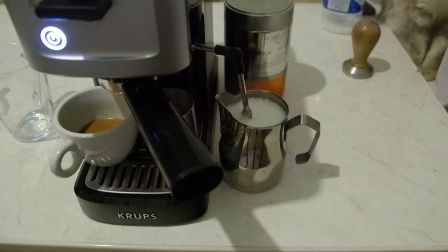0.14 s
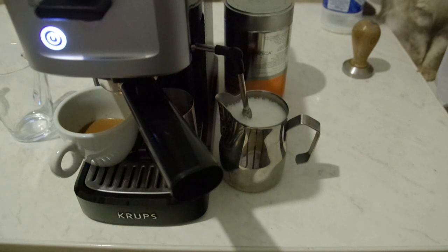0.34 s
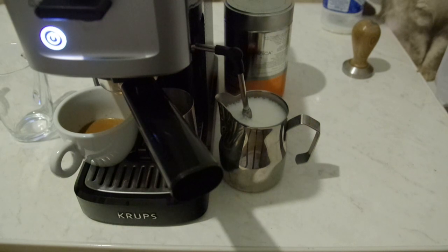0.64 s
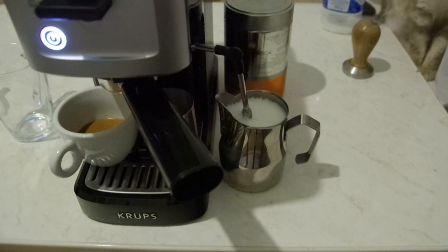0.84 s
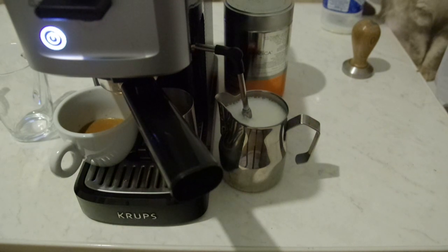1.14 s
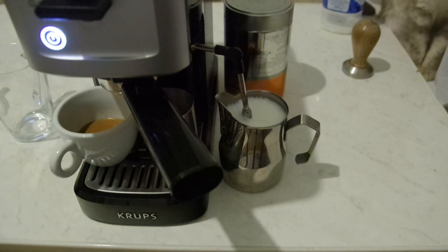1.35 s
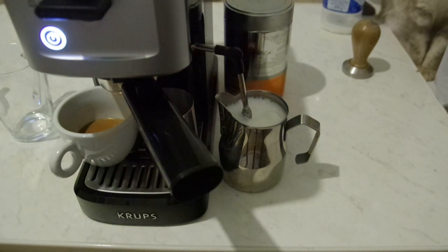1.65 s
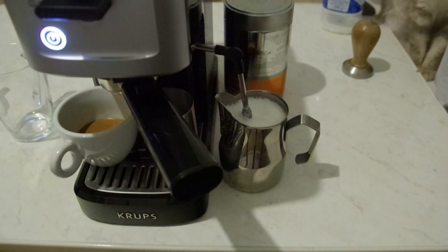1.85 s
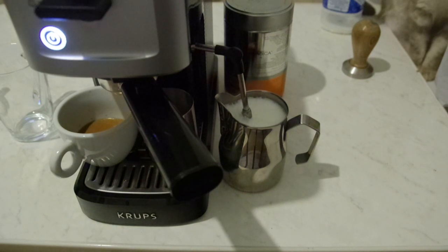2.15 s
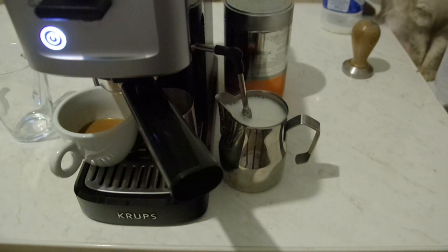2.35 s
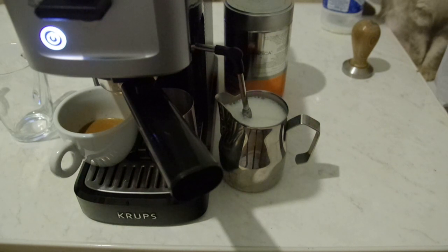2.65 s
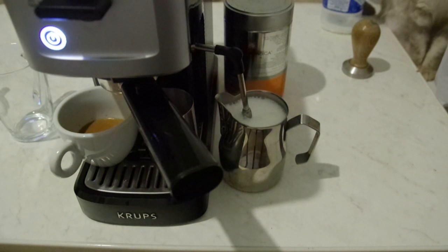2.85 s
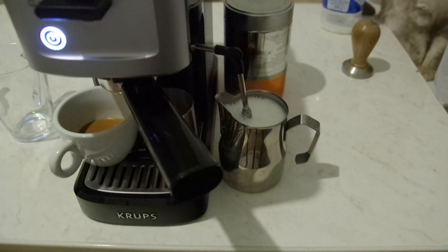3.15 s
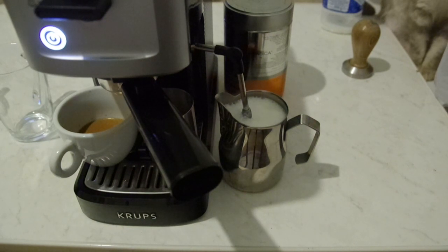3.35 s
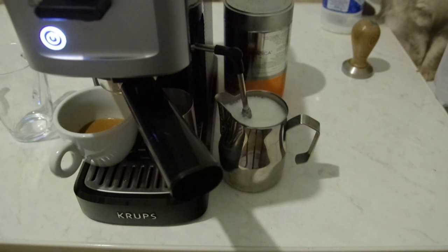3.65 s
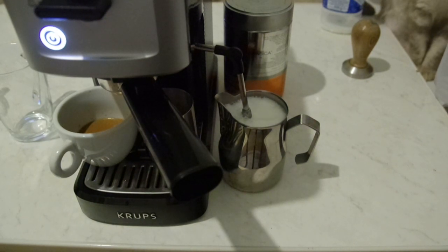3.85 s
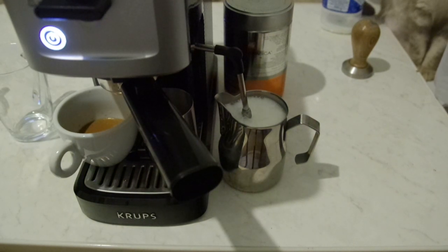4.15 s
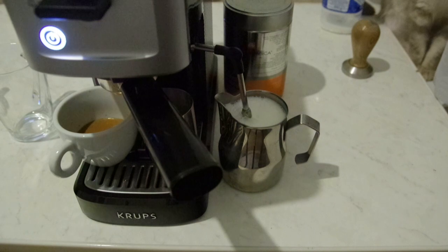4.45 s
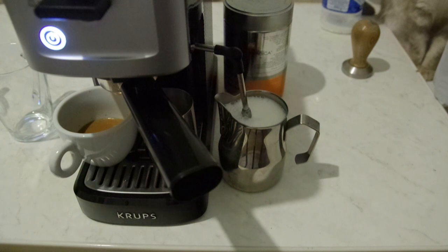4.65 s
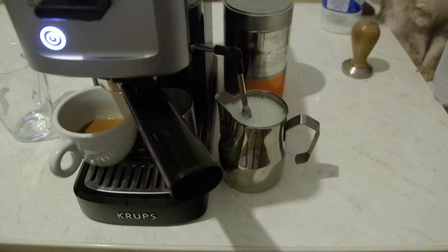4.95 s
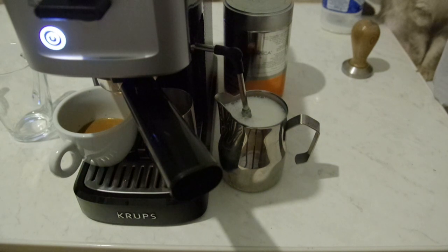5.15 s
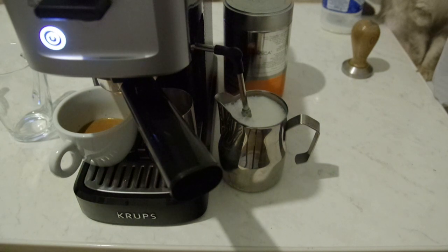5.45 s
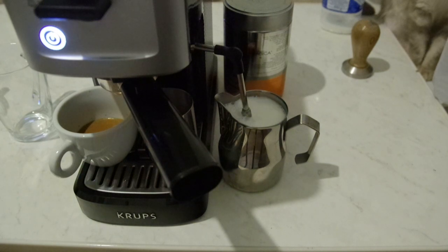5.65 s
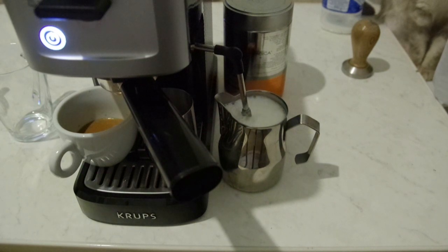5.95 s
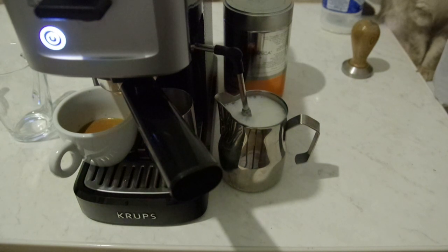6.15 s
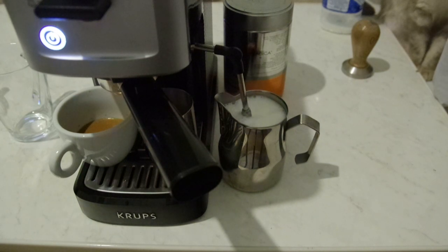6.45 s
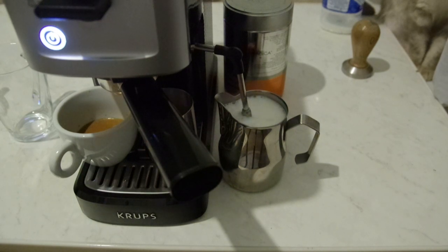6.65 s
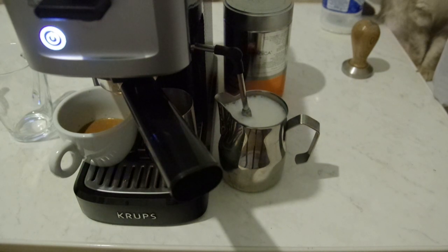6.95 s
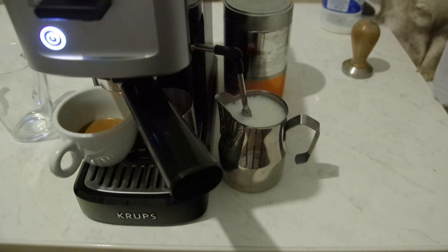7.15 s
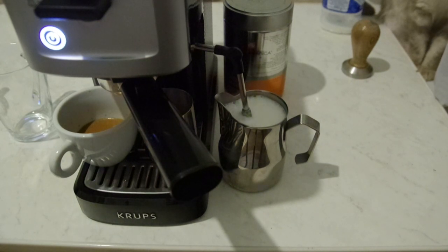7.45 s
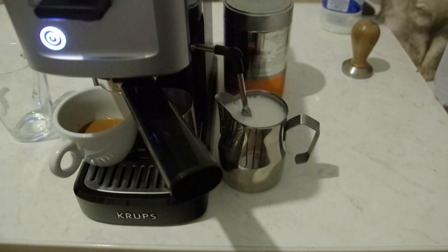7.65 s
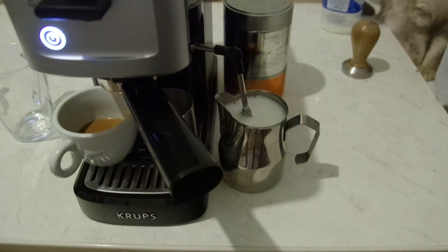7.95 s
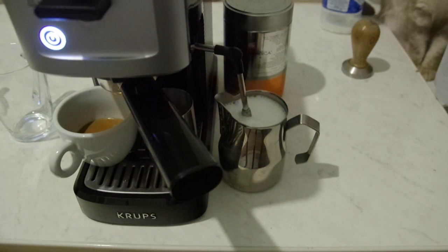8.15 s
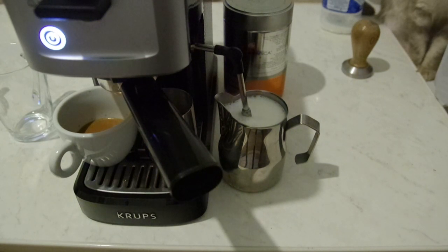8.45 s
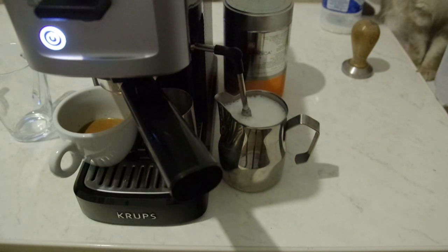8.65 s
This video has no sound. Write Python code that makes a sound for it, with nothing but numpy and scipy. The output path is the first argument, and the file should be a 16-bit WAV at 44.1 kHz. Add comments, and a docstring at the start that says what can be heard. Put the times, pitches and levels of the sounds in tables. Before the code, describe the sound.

A steam wand hisses and seethes in milk in a metal pitcher, slowly softening, while a pump thuds in fours with a short rest.

```python
"""The steam wand of a small espresso machine froths milk in a steel pitcher on a kitchen counter, heard close.
Collapsing steam is noise and clicks shaped by the milk and the ringing pitcher; the tip hisses and fizzes
as brighter noise, and bright spurts break out at the surface. The pump feeds the heater with single thuds,
four and a rest, that ring the housing and shake loose parts. Low room noise and a short kitchen echo remain."""
import sys
import numpy as np
from scipy import signal
from scipy.fft import rfft, irfft, next_fast_len
from scipy.io import wavfile
from scipy.ndimage import uniform_filter1d

SR = 44100
rng = np.random.default_rng(int(sys.argv[2]) if len(sys.argv) > 2 else 0)


def output_pcm(signal):
    """Save a mono or channel-first signal as 16-bit PCM at the path in sys.argv[1].

    Samples are clipped to [-1, 1] before scaling.
    """
    pcm = np.clip(np.atleast_2d(signal).T, -1, 1) * 32767
    wavfile.write(sys.argv[1], SR, np.round(pcm).astype(np.int16))


N = 387638
TIME = np.arange(N) / SR  # s
ESCAPE_DB = -34  # bare steam above the milk at the start


def undb(db):
    """Amplitude factor of a level in dB."""
    return 10 ** (np.asarray(db) / 20)


def unit(x):
    """Scale to rms 1."""
    return x / np.sqrt(np.mean(x ** 2))


def colour(x, points, peaks=()):
    """Shape a sound by a smooth spectrum with narrow resonances on top; rms 1."""
    size = next_fast_len(N)
    f = np.fft.rfftfreq(size, 1 / SR) + 1  # 1 Hz up, to keep the logarithm finite
    hz, db = np.transpose(points)
    gain = undb(np.interp(np.log(f), np.log(hz), db))
    power = 1 + sum(undb(level) ** 2 * 4 / (1 + (2 * (f - centre) / width) ** 2)
                    for centre, width, level in peaks)
    shaped = irfft(rfft(x, size) * gain * np.sqrt(power), size)
    return unit(shaped[..., :N])


def band(x, lo_hz, hi_hz):
    """Gentle band-pass."""
    edges = [lo_hz, min(hi_hz, SR / 2 - 100)]
    return signal.sosfilt(signal.butter(2, edges, "band", fs=SR, output="sos"), x)


def walk(rate):
    """Chance wavering of spread near 1, through a fresh random value `rate` times a second."""
    knots = rng.standard_normal(4096)
    return np.interp(TIME * rate, np.arange(len(knots)), knots)


def crackle(rate, spread_db):
    """Tiny clicks at random moments, `rate` a second, a few much stronger than the rest; rms 1."""
    struck = rng.random(N) < rate / SR
    size = np.minimum(rng.exponential(size=N), 6)
    sign = rng.choice([-1, 1], N)
    return unit(struck * sign * undb(spread_db * size))


def room(x, wet_db, t60, pan_db, early_db):
    """Direct sound, near reflections off counter and machine, then a diffuse tail differing left and right."""
    t = TIME[:SR // 2]
    near = unit(rng.standard_normal((2, len(t))) * np.exp(-t / 0.0037) * (t > .0004))
    tail = unit(rng.standard_normal((2, len(t))) * undb(-60 * t / t60) * (t > .005))
    response = (undb(early_db) * near + undb(wet_db) * tail) / np.sqrt(len(t))
    response[:, 0] += 1  # direct sound
    response /= np.sqrt(np.sum(response.mean(axis=0) ** 2))
    heard = signal.fftconvolve(x[None], response, axes=1)[:, :N]
    return heard * undb([[pan_db / 2], [-pan_db / 2]])  # positive pan: louder on the left


def rolling(curve, swell_db, rate):
    """A level curve in dB that swells and sinks by chance as the milk rolls round the pitcher."""
    return np.interp(TIME, *np.transpose(curve)) + swell_db * walk(rate)


def seething(swell, gain_db, flutter_db, pops_db):
    """Steam bubbles collapse in quick uneven clusters and ring the pitcher; their sizes shift as the milk rolls."""
    # How hard the steam seethes in the milk. Each row: time in seconds, level in dB before gain_db.
    seethe_levels = [(0.0, -31), (0.51, -35.5), (0.98, -30), (2.1, -34), (2.23, -30), (2.27, -34.5),
                     (2.69, -32), (2.91, -35), (4.04, -33.5), (4.21, -35), (4.8, -36.5), (4.94, -33),
                     (5.85, -33), (5.92, -36.5), (6.02, -30), (6.14, -38.5), (6.31, -34.5), (6.41, -38),
                     (7.74, -39.5), (8.79, -37)]
    # Spectrum of the collapsing steam. Each row: frequency in Hz, relative level in dB.
    seethe_spectrum = [(150, -42), (500, -15), (1000, -21.5), (1400, -10.5), (1850, -7.5), (2130, 2),
                       (2550, -1), (2900, -2.5), (3500, -1), (4200, -0.5), (4700, -9.5), (6000, -13),
                       (9000, -28), (16000, -30)]
    # Resonances of the steel pitcher. Each row: frequency in Hz, width in Hz,
    # strength in dB over the seething (colour puts the peak 6 dB above it).
    pitcher_modes = [(2240, 37, -14.5), (2463, 21, -11.5), (2592, 29, -4.5), (3046, 24, -2.5),
                     (3293, 25, -24), (3513, 23, -2.5), (3620, 62, -5), (3960, 12, 3), (4270, 25, -2),
                     (4350, 56, -5.5), (5084, 15, 8), (5300, 27, 1)]
    collapses = unit(rng.standard_normal(N) + undb(pops_db) * crackle(rate=2200, spread_db=2.5))
    clusters = collapses * undb(flutter_db * walk(130) + 0.5 * walk(30))
    sound = colour(clusters, seethe_spectrum, pitcher_modes)
    low_shift = 0.13 * walk(35) * band(sound, 1920, 2530)
    high_shift = 0.14 * walk(35) * band(sound, 3350, 5050)
    level_db = rolling(seethe_levels, swell_db=0.64, rate=12) + diverted(swell)
    sound = (sound + low_shift + high_shift) * undb(level_db + gain_db)
    return room(sound, wet_db=-5.0, t60=0.29, pan_db=-0.55, early_db=-8.5)


def diverted(swell):
    """Drop of the seething (dB): steam that spurts into the air no longer goes into the milk."""
    full_drop_db, response_s = -0.5, .12  # limit for a very strong spurt; averaging time of the milk
    out = uniform_filter1d(swell, int(response_s * SR))
    return full_drop_db * out / (out + undb(ESCAPE_DB))


def hiss(flutter_db, fizz_db):
    """The jet at the tip, with foam fizzing; its colour wanders as the milk swirls over it."""
    # Level of the hiss at the tip. Each row: time in seconds, level in dB.
    jet_levels = [(0.0, -32.5), (0.68, -32.5), (0.83, -28.5), (1.93, -35), (3.72, -33), (4.16, -37),
                  (5.43, -37), (5.7, -40.5), (6.19, -36), (6.36, -38.5), (6.83, -41.5), (7.61, -36),
                  (8.2, -44), (8.79, -44)]
    # Spectrum of the jet. Each row: frequency in Hz, relative level in dB.
    hiss_spectrum = [(2000, -22), (4000, -6), (5200, -2), (5900, -1), (6800, -1), (7600, 0.5), (9000, -2.5),
                     (10500, -9), (12500, -18.5), (16000, -38)]
    fizz = undb(fizz_db) * crackle(rate=2500, spread_db=3.0)
    jet = colour(rng.standard_normal(N) + fizz, hiss_spectrum)
    swirl = 0.26 * walk(28) * band(jet, 4730, 7960) + 0.33 * walk(24) * band(jet, 7600, 10000)
    level_db = rolling(jet_levels, swell_db=.5, rate=8)
    sound = (jet + swirl) * undb(level_db + flutter_db * walk(90))
    return room(sound, wet_db=-3.0, t60=0.44, pan_db=-2.5, early_db=-5.5)


def spurts(swell, gain_db, flutter_db):
    """Bare steam escapes above the milk: a bright sputter that swells whenever the tip breaks the surface."""
    # Spectrum of the bare steam. Each row: frequency in Hz, relative level in dB.
    spurt_spectrum = [(3000, -23), (6000, -8), (7200, 2.5), (9800, 1.5), (11500, -2), (16000, -9.5)]
    steam = rng.standard_normal(N) + 0.73 * crackle(rate=2000, spread_db=2.7)
    sputter = colour(steam, spurt_spectrum) * undb(gain_db + flutter_db * walk(200))
    strength = np.hypot(swell, escaping(waver_db=3.4))
    return room(strength * sputter, wet_db=-3.0, t60=0.26, pan_db=0.5, early_db=-18)


def spurt_swell():
    """Summed strength of the spurts as the tip breaks the surface."""
    # Each row: peak time in seconds, peak level in dB before the gain of spurts(),
    # length in seconds (time constants of rise and fall together).
    spurt_events = [(0.007, -25, 0.056), (0.108, -26.5, .044), (0.22, -19.5, 0.049), (0.29, -27, .03),
                    (0.397, -26.5, .04), (0.463, -22, 0.04), (1.582, -22, .016), (1.684, -22, 0.029),
                    (2.132, -21, 0.03), (2.24, -24, 0.032), (2.31, -27, 0.046), (3.253, -20.5, 0.011),
                    (3.578, -27.5, 0.057), (3.653, -22.5, .018), (4.176, -29, 0.043), (4.216, -27.5, .036),
                    (4.824, -31.5, 0.031), (6.614, -26.5, .012)]
    return sum(undb(db) * burst(peak_s, length_s) for peak_s, db, length_s in spurt_events)


def burst(peak_s, length_s):
    """Envelope of one spurt: an exponential rise and a slower fall."""
    rise_share = 0.42  # of the length; the rest is the fall
    age = (TIME - peak_s) / length_s
    decay = np.maximum(-age / rise_share, age / (1 - rise_share))
    return np.exp(-np.minimum(decay, 20))


def escaping(waver_db):
    """Strength of the bare steam: it fades under the rising foam, wavers and spits at random."""
    fade_db_per_s = 1.75
    covered_s, covering_s, covered_db = 4.3, 0.053, -4  # the foam covers the tip and the level drops
    spits_per_s, spit_s = 5, .018
    spit_db, spit_spread_db = 3, 6  # relative to the steady steam
    covered = (1 + np.tanh((TIME - covered_s) / covering_s)) / 2
    steady = undb(ESCAPE_DB - fade_db_per_s * TIME + covered_db * covered + waver_db * walk(25))
    struck = rng.random(N) < spits_per_s / SR
    moments = struck * undb(spit_db + spit_spread_db * rng.standard_normal(N))
    spits = signal.fftconvolve(moments, burst(TIME[-1] / 2, spit_s), "same")
    return steady * np.hypot(1, spits)


def swirled(x, depth, rate):
    """The whirl in the pitcher slowly shifts the weight between four bands of the steam."""
    for lo_hz, hi_hz in [(1900, 2900), (3200, 4600), (5000, 6700), (7200, 10200)]:
        x = x + depth * walk(rate) * band(x, lo_hz, hi_hz)
    return x


def pump(thud_db, rattle_db, rattle_fall_s, shiver_db, shiver_fall_s, tick_db, tick_fall_s):
    """Each stroke rings the housing; loose parts rattle, the drip tray shivers on and the valve ticks softly."""
    # Modes of the machine's housing. Each row: frequency in Hz, level in dB before thud_db, t60 in seconds.
    housing_modes = [(77.6, -31.5, 0.59), (177.5, -34, 0.21), (273.5, -36.5, 0.22), (282.4, -38.5, 0.34),
                     (323, -44, 0.31), (360, -34, 0.25), (456.7, -43.5, 0.24), (524, -41, 0.31),
                     (551.3, -21, 0.075), (604, -32.5, 0.24), (623.3, -27.5, 0.13), (717, -34.5, 0.14),
                     (761.4, -34.5, 0.2), (893, -31.5, 0.1), (990, -55, 0.23), (1230, -40, .14)]
    # Spectra of the shaken parts. Each row: frequency in Hz, relative level in dB.
    rattle_spectrum = [(100, -26), (170, 1.5), (350, 5.5), (750, -3.5), (1250, -5.5), (1700, -8.0), (4000, -35)]
    shiver_spectrum = [(150, -19), (290, 1.0), (420, -2.5), (580, 2), (750, -4.5), (1200, -12.0), (3000, -42)]
    t = TIME[:SR // 2]
    force = knocks(scatter=0.091)
    ring = sum(undb(db - 60 * t / t60) * np.sin(2 * np.pi * hz * t) for hz, db, t60 in housing_modes)
    softened = ring * (1 - np.exp(-t / 0.00028))  # the rubber mounts soften the edge of each blow
    thud = band(signal.fftconvolve(force, softened), 208, 940)[SR:SR + N]

    def shaken(drive, fall_s):
        """Envelope of parts that the blows set shaking."""
        shape = np.exp(-t / fall_s) * (1 - np.exp(-t / 0.00056))
        return signal.fftconvolve(drive, shape)[SR:SR + N]

    rattle = shaken(force ** 2, rattle_fall_s) * colour(rng.standard_normal(N), rattle_spectrum)
    shiver = shaken(force ** 2, shiver_fall_s) * colour(rng.standard_normal(N), shiver_spectrum)
    # the fourth power lets only the hardest blow, the landing of the piston, tick clearly
    tick = shaken(force ** 4, tick_fall_s) * unit(band(rng.standard_normal(N), 900, 17000))
    body = undb(thud_db) * thud + undb(rattle_db) * rattle + undb(shiver_db) * shiver
    return (room(body, wet_db=-14, t60=.42, pan_db=2.8, early_db=-17)
            + room(undb(tick_db) * tick, wet_db=-4, t60=0.35, pan_db=9, early_db=-1))


def knocks(scatter):
    """Force of the piston on the housing, from one second before the start; no two strokes are quite alike."""
    # Blows within a stroke: the piston is pulled in, then sprung back.
    # Each row: delay after the stroke's start in seconds, mean force (relative, signed).
    piston_blows = [(.0048, .16), (.0108, .33), (.0134, .95), (.0203, .43), (.0285, .55), (.0341, -.41)]
    force = np.zeros(N + 2 * SR)
    delay, size = np.transpose(piston_blows)
    for start in stroke_starts():
        places = ((1 + start + delay) * SR).astype(int)
        force[places] += size * (1 + scatter * rng.standard_normal(len(size)))
    return force


def stroke_starts():
    """Start times of the pump strokes (s): whole mains cycles apart, four strokes and a rest, over and over."""
    mains_hz, first_s = 50, -.642
    # Gaps from one stroke to the next. Each entry: gap in mains cycles.
    gap_cycles = [16, 15, 16, 31]
    gaps = np.tile(gap_cycles, int(TIME[-1] * mains_hz / sum(gap_cycles)) + 2)
    starts = first_s + (np.cumsum(gaps) - gaps) / mains_hz
    return starts[starts < TIME[-1]]


def background(air_db, drone_db, drone_hz):
    """Low room noise, and the housing droning faintly as the steam runs through."""
    # Spectrum of the kitchen's room noise. Each row: frequency in Hz, relative level in dB.
    kitchen_spectrum = [(20, 1), (50, -0.5), (75, -4), (100, -4.5), (125, -4), (200, -4.5), (300, -7),
                        (600, -5), (1000, -9), (3000, -14.5), (16000, -31)]
    # one noise shared by both sides, and one of its own for each
    air = colour(rng.standard_normal(N) + 0.75 * rng.standard_normal((2, N)), kitchen_spectrum)
    drone = unit(band(rng.standard_normal(N), drone_hz - 7, drone_hz + 7))
    return undb(air_db) * air + undb(drone_db) * drone


def scene():
    """Wand, pump and kitchen together."""
    swell = spurt_swell()
    wand = (seething(swell, gain_db=1.0, flutter_db=1.3, pops_db=-3)
            + hiss(flutter_db=1.9, fizz_db=-2.5)
            + spurts(swell, gain_db=-0.07, flutter_db=2.5))
    wand = swirled(wand, depth=0.084, rate=4)
    # the pitcher stands a little to the right, so its sound reaches the left microphone just later:
    # an all-pass delays it by a fraction of a sample
    wand[0] = signal.lfilter([.25, 1], [1, .25], wand[0])
    strokes = pump(thud_db=1.5, rattle_db=-34.0, rattle_fall_s=0.016, shiver_db=-40, shiver_fall_s=0.072,
                   tick_db=-33.5, tick_fall_s=0.009)
    return wand + strokes + background(air_db=-49.5, drone_db=-60, drone_hz=274.2)


def record(dry):
    """The recorder cuts the top steeply."""
    top_hz = 15950
    return signal.sosfilt(signal.ellip(10, .2, 80, top_hz, fs=SR, output="sos"), dry)


dry = scene()
out = record(dry)
output_pcm(out)
```